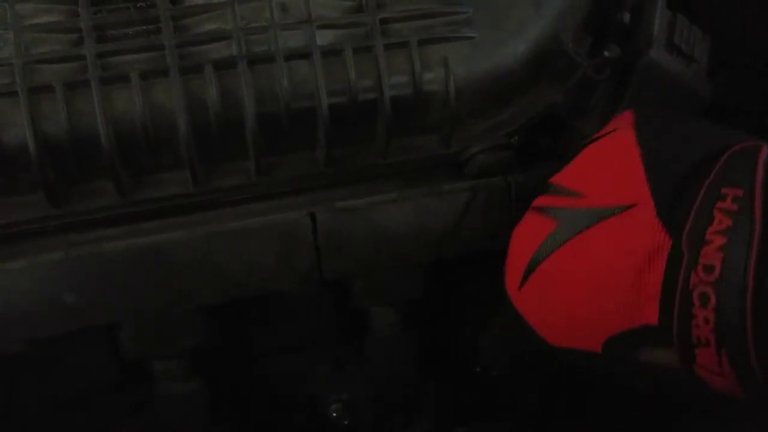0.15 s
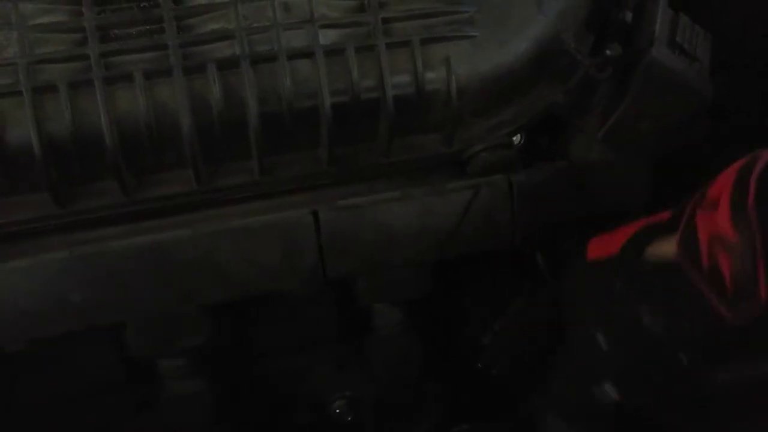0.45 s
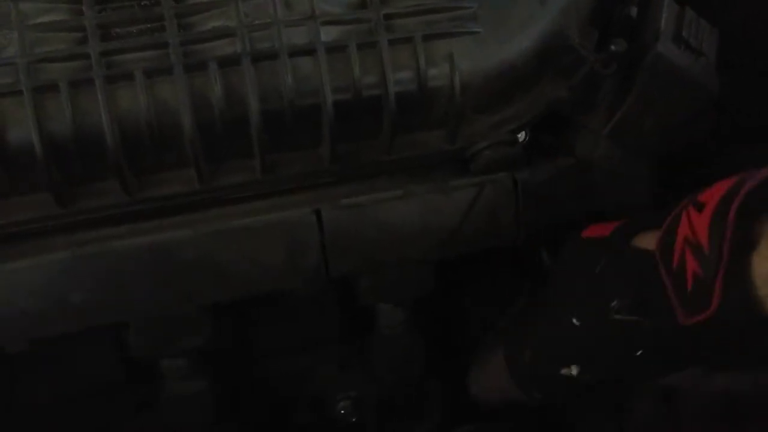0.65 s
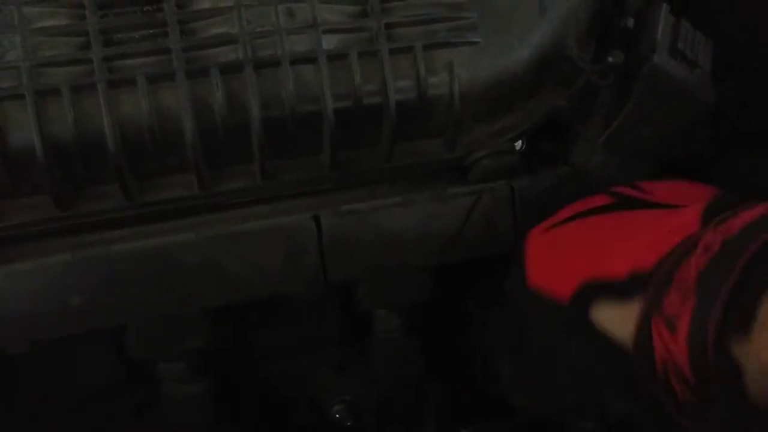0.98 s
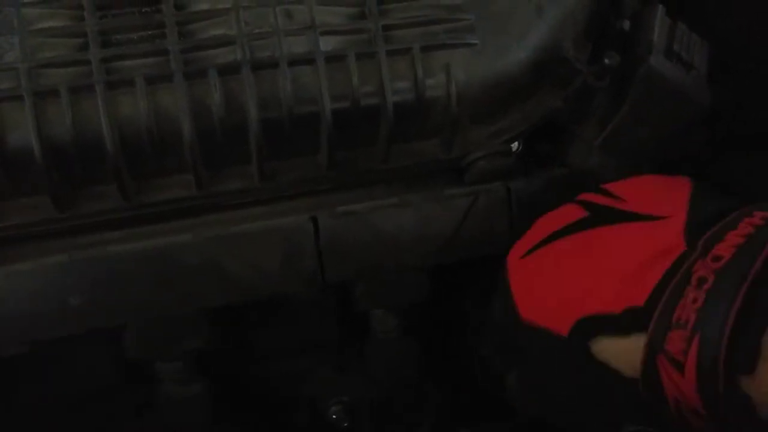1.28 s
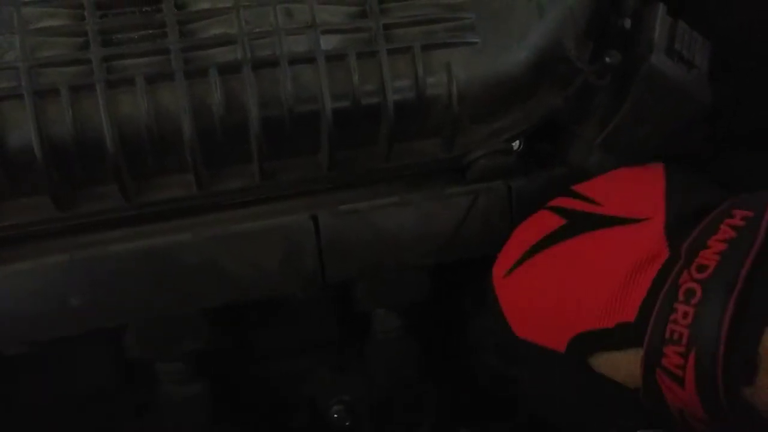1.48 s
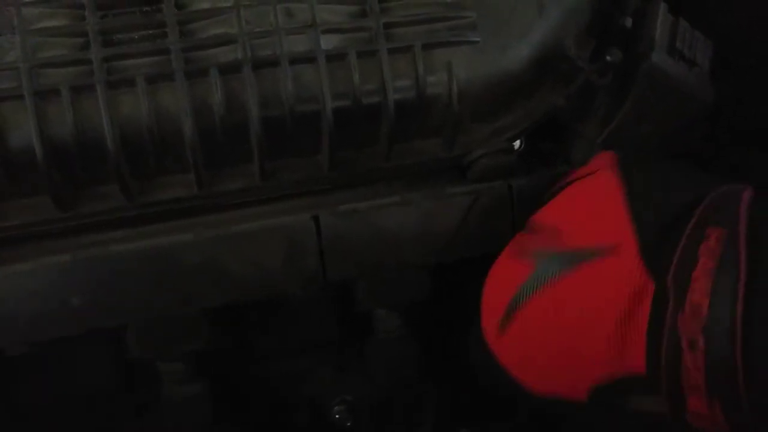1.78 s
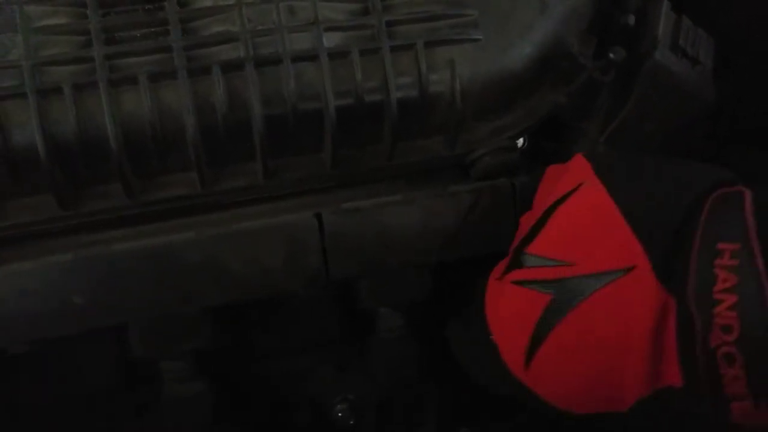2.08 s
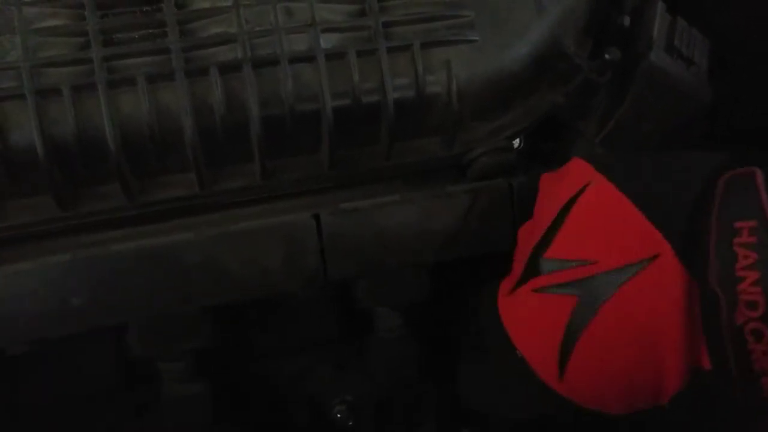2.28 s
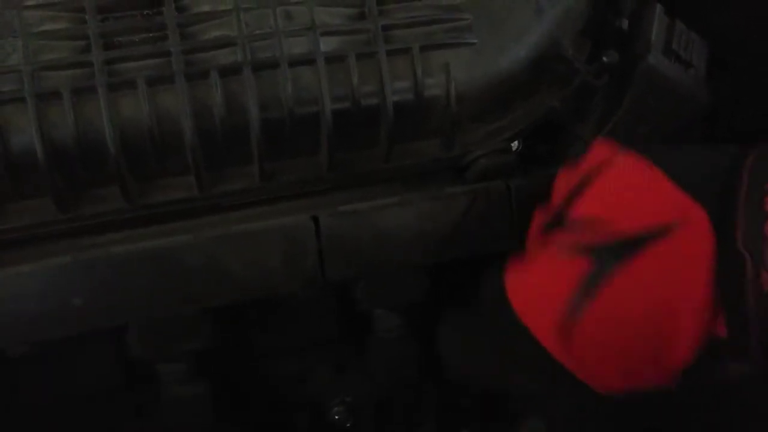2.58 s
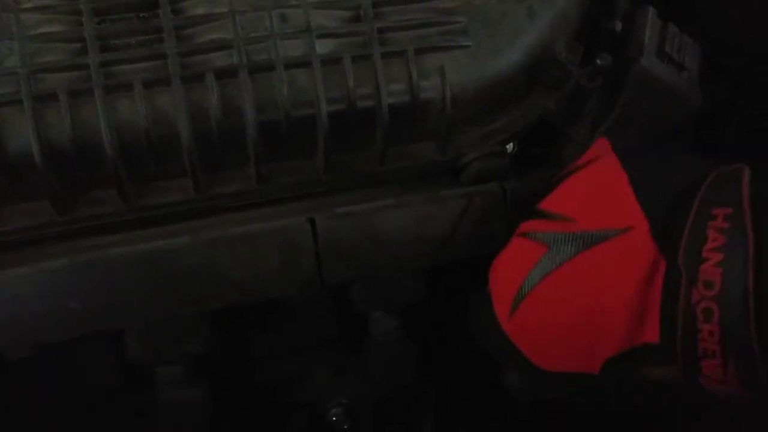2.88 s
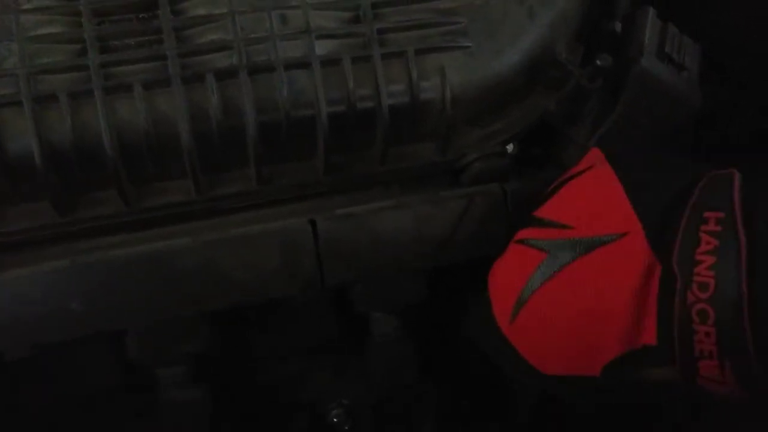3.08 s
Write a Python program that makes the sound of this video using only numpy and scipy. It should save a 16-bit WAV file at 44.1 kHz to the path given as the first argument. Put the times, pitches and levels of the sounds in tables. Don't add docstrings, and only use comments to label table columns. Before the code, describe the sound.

Plastic filler cap being twisted by a gloved hand, hollow knocks, scraping, then a loud final clatter

```python
import sys
import numpy as np
from scipy import signal
from scipy.fft import rfft, irfft, next_fast_len
from scipy.io import wavfile
from scipy.ndimage import uniform_filter1d, minimum_filter1d, map_coordinates

SR = 44100
rng = np.random.default_rng(int(sys.argv[2]) if len(sys.argv) > 2 else 0)


def file_out(sig):
    cols = np.atleast_2d(sig).T
    lim = np.clip(cols, -1, 1)
    pcm = np.round(lim * 32767).astype(np.int16)
    wavfile.write(sys.argv[1], SR, pcm)


def linear_from_db(decibels):
    return 10 ** (np.asarray(decibels, float) / 20)


N = 143325

# (frequency [Hz], width [Hz], level [dB])
NECK = [(423, 66, -9), (594.5, 53, -2), (751.6, 40.6, -4), (918, 54, -8), (1020, 70, 0), (1185, 50.4, -2.5),
        (1342.4, 83, 1.5), (1550, 81, -4), (1750, 60, -12.5), (2025, 82, -11), (2122, 59, -9.5),
        (2644, 110, -8), (3400, 150, -12), (4660, 330, -21)]
# (frequency [Hz], width [Hz], level [dB])
CAP = [(361, 40, 0), (495, 45, -0.5), (748, 65, -2), (883, 58, -5), (1133, 40, -8.5), (1526, 80, -16),
       (1944, 37, -10.5), (2530, 71, -15), (3170, 90, -9), (3940, 160, -17.5)]
# (frequency [Hz], width [Hz], level [dB])
SHELL = [(431, 20.7, -2), (856, 75, -1.5), (974, 24, -1), (1560, 33, -1), (1750, 38, -4), (2200, 59, -13),
         (2314, 14, -18), (2540, 34, -6), (2820, 78, -7.5), (3300, 88, -16), (3910, 29, -15),
         (4360, 120, -23), (4660, 170, -14.5), (5120, 25, -27)]


def unit(x):
    return x / np.sqrt(np.mean(x ** 2) + 1e-20)


def along(points, hz):
    f, v = np.transpose(points)
    return np.interp(np.log(hz + 1), np.log(f + 1), v)


def wobble(rate):
    return map_coordinates(rng.standard_normal(N // 50), [np.arange(N) * rate / SR])


def filtered(x, response):
    m = next_fast_len(x.shape[-1] + 8192)
    spectrum = rfft(x, m) * response(np.fft.rfftfreq(m, 1 / SR))
    return irfft(spectrum, m)[..., :x.shape[-1]]


def causal(gain):
    def response(hz):
        cepstrum = irfft(np.log(gain(hz) + 1e-6))
        half = len(cepstrum) // 2
        cepstrum[1:half] *= 2
        cepstrum[half + 1:] = 0
        return np.exp(rfft(cepstrum))
    return response


def tinted(x, points):
    return filtered(x, causal(lambda hz: linear_from_db(along(points, hz))))


def body(modes):
    def response(f):
        total = 0
        for k, (hz, width, db) in enumerate(modes):
            damping = 1j * f * width
            total = total + (-1) ** k * linear_from_db(db) * damping / (hz * hz - f * f + damping)
        return total
    return response


def grains(rate, spread_db):
    u = rng.random((3, N))
    size = linear_from_db(-spread_db * np.log(np.maximum(u[2], 0.04)))
    return unit((u[0] < rate / SR) * np.sign(u[1] - 0.5) * size)


def add(out, s, x):
    part = out[round(s * SR):][:len(x)]
    part += x[:len(part)]


def knocks(events, gain_db, modes, snap_db=14):
    favour_oct, rise_s = 0.87, 0.0011
    echo_s, echo_db = 0.0065, -11
    out, t = np.zeros(N), np.arange(SR // 8) / SR
    rise = 1 - np.exp(-(t / rise_s) ** 2)
    hz, width, db = np.transpose(modes)[:, :, None]
    for event in events:
        s, peak_db, pitch_hz = event[:3]
        linger_hz = event[-1]
        r = rng.standard_normal((3, len(modes), 1))
        octaves = np.log2(hz / pitch_hz)
        level = db + 1.5 * r[0] - 6 * (octaves / favour_oct) ** 2 / (1 + octaves ** 2)
        level = level + 8 * np.exp(-(np.log(hz / linger_hz) / 0.045) ** 2)
        swing = np.sin(2 * np.pi * hz * (1 + 0.006 * r[1]) * t + 0.3 * r[2])
        ring = (linear_from_db(level) * np.exp(-np.pi * width * t) * swing).sum(0)
        snap = linear_from_db(snap_db) * np.exp(-np.pi * 400 * t) * np.sin(2 * np.pi * pitch_hz * t)
        hit = rise * (ring + snap)
        gain = linear_from_db(peak_db + gain_db) / np.abs(hit).max()
        add(out, s, gain * hit)
        add(out, s + echo_s, gain * linear_from_db(echo_db) * rise * snap)
    return out


def still_air():
    # (frequency [Hz], level [dB])
    air_colour = [(30, -40), (110, -10), (200, 1), (400, -0.5), (1200, -7.5), (3000, -14), (6000, -20),
                  (16000, -18)]
    air = filtered(rng.standard_normal(N), lambda hz: linear_from_db(along(air_colour, hz)))
    return linear_from_db(-62.5 + 0.09 * wobble(5.8)) * unit(air)


def strokes(column):
    # (middle [s], length [s], glove level [dB], thread level [dB])
    hand = [(0.338, 0.18, -71.5, -70), (0.56, 0.09, -70.5, -71.5), (0.723, 0.014, -66.5, -84),
            (0.916, 0.26, -68, -60), (0.961, 0.064, -61, -48.5), (1.043, 0.048, -80, -59.5),
            (1.3, 0.056, -78, -63), (1.464, 0.15, -68.5, -67), (1.567, 0.071, -68.5, -85),
            (1.712, 0.12, -65.5, -74), (1.801, 0.088, -73, -61), (1.937, .12, -60.5, -79),
            (2.05, 0.14, -66, -64), (2.139, 0.12, -62.5, -57.5), (2.255, 0.072, -67, -55.5),
            (2.354, 0.13, -65.5, -60.5), (2.501, 0.13, -64, -55.5), (2.653, 0.1, -60, -46.5),
            (2.73, 0.14, -59.5, -56), (2.82, 0.025, -54.5, -67), (2.9, 0.076, -69, -81),
            (2.985, 0.13, -60, -85)]
    t, power = np.arange(N) / SR, np.zeros(N)
    for row in hand:
        power += linear_from_db(2 * row[column]) * np.exp(-(3 * (t - row[0]) / row[1]) ** 2)
    return np.sqrt(power)


def glove():
    # (frequency [Hz], level [dB])
    cloth = [(400, -28), (1500, -1), (4500, 0.5), (7000, -3), (16000, -10.5)]
    fibres = grains(rate=7300, spread_db=0.5) + 0.47 * rng.standard_normal(N)
    return strokes(column=2) * linear_from_db(4 + 1.2 * wobble(30)) * unit(tinted(fibres, cloth))


def thread():
    slips = grains(rate=370, spread_db=6.5) + 0.52 * rng.standard_normal(N)
    return strokes(column=3) * linear_from_db(1.9 * wobble(35)) * unit(filtered(slips, body(NECK)))


def neck_knocks():
    # (time [s], peak level [dB], contact pitch [Hz], lingering mode [Hz])
    hits = [(0.285, -32.5, 1080, 1020), (0.31, -41.5, 980, 740), (0.403, -26.5, 1150, 750),
            (0.5405, -27.5, 926, 584), (0.778, -32.5, 600, 578), (0.957, -39, 1310, 750),
            (0.9705, -25, 1000, 1020), (0.9755, -28, 925, 750), (0.979, -37, 1120, 590),
            (0.9825, -33.5, 820, 583), (1.025, -43.5, 1400, 590), (2.3335, -16, 1380, 1315),
            (2.336, -20, 1360, 745), (2.4645, -16.5, 1440, 1317), (2.4685, -14, 1203, 1170),
            (2.47, -27, 587, 594), (2.524, -35, 1090, 1190), (2.528, -36, 670, 750), (2.538, -36, 810, 750),
            (2.615, -26.5, 710, 750), (2.626, -29.5, 960, 1020), (2.673, -21.5, 1020, 1020),
            (2.68, -19, 1190, 1190)]
    return knocks(hits, -3.5, NECK)


def bay(x):
    # (frequency [Hz], t60 [s])
    decay = [(200, 0.8), (1000, 0.32), (4000, 0.4), (12000, 0.26)]
    out, step = np.zeros(N), SR // 4
    for start in range(0, N, step):
        hz, t, z = signal.stft(rng.standard_normal(SR // 2), SR, nperseg=256)
        fade = linear_from_db(-60 * t / along(decay, hz)[:, None])
        tail = signal.istft(z * fade, SR, nperseg=256)[1]
        answer = signal.fftconvolve(x[start:start + step], tail / np.linalg.norm(tail))
        add(out, start / SR + 0.0025, answer)
    return linear_from_db(-17.5) * out


def thuds():
    # (time [s], level [dB])
    pushes = [(0.361, -59), (2.186, -57), (2.25, -58), (2.503, -48), (2.614, -51)]
    centre_hz, width_hz = 236, 210
    out, t = np.zeros(N), np.arange(SR // 10) / SR
    for s, db in pushes:
        noise = rng.standard_normal(len(t))
        puff = unit(filtered(noise, lambda f: np.exp(-((f - centre_hz) / width_hz) ** 2)))
        add(out, s, linear_from_db(db) * puff * (t / 0.0076) * np.exp(1 - t / 0.0075))
    return out


def ticks():
    # (time [s], peak level [dB], t60 [s])
    edge_ticks = [(0.3974, -36, .006), (0.548, -42.5, 0.0068), (0.9702, -44, .01), (2.3339, -39.5, 0.014),
                  (2.4644, -38, 0.024), (2.666, -42, 0.017), (2.676, -33, 0.028), (2.7028, -46, 0.014),
                  (2.7166, -47, 0.013), (2.757, -34, 0.01), (2.811, -45.5, 0.021), (2.822, -44, 0.02),
                  (3.0755, -30, 0.016), (1.877, -72, .018), (2.187, -62, .018)]
    # (frequency [Hz], level [dB])
    edge = [(800, -25), (1800, 0), (3200, 4), (5000, 0), (5700, -16), (16000, -21)]
    out, t = np.zeros(N), np.arange(SR // 25) / SR
    for s, db, t60 in edge_ticks:
        add(out, s, linear_from_db(db + 7 - 60 * t / t60) * rng.standard_normal(len(t)))
    return tinted(out, edge)


def ratchet():
    # (time [s], peak level [dB], contact pitch [Hz])
    teeth = [(2.667, -7.5, 1240), (2.687, -12.5, 1140), (2.7025, -13, 1174), (2.7173, -17, 1150),
             (2.7567, -8.5, 1290), (0.5491, -14.5, 1480)]
    return knocks(teeth, -3.5, NECK, snap_db=21)


def creaks():
    # (time [s], peak level [dB], strongest pitch [Hz])
    slips = [(0.919, -39.5, 1350), (1.269, -54, 1400), (1.558, -47, 570), (1.764, -47.5, 974),
             (1.789, -41.5, 970), (1.953, -41, 820), (2.006, -45, 780), (2.032, -43.5, 1360),
             (2.068, -41.5, 1100), (2.103, -42.5, 1380), (2.128, -46.5, 990), (2.182, -40, 310)]
    return knocks(slips, -3.5, NECK)


def seal():
    # (start [s], length [s], level [dB], pitch [Hz], octave level [dB])
    squeaks = [(2.86, 0.053, -75, 5590, 11), (2.935, 0.018, -63, 5690, -22), (2.955, 0.087, -45, 5690, -24),
               (3.025, 0.026, -54, 5690, -20), (3.05, 0.025, -48, 5690, -16)]
    # (start [s], length [s], level [dB], centre [Hz], width [Hz])
    whiff = (2.997, .066, -58, 7550, 750)
    out = np.zeros(N)
    phase = 2 * np.pi * np.cumsum(1 + 0.002 * wobble(43)) / SR
    for s, length, db, hz, octave_db in squeaks:
        octave = linear_from_db(octave_db) * np.sin(2 * hz * phase + 1.5 * wobble(150))
        tone = (np.sin(hz * phase) + octave) * linear_from_db(1.6 * wobble(80))
        swell = np.sqrt(np.hanning(round(length * SR)))
        add(out, s, linear_from_db(db) * swell * tone[round(s * SR):][:len(swell)])
    s, length, db, hz, width = whiff
    air = unit(filtered(rng.standard_normal(SR // 4), lambda f: np.exp(-((f - hz) / width) ** 2)))
    swell = np.hanning(round(length * SR)) ** 0.19
    add(out, s, linear_from_db(db) * swell * air[:len(swell)])
    return out


def blows():
    # (time [s], level [dB], hold [s], t60 [s], bright crack level [dB])
    heavy = [
        (2.9135, -20.5, 0.013, 0.078, -44),
        (3.078, -24.5, 0.0086, 0.15, -17),
        (3.1805, -12, 0.032, 0.22, -21),
        (3.240, -17, .012, .1, -16),
    ]
    crack_holds = [0.015, 0.0074, 0.0033, .012]
    crack_t60s = [.015, 0.034, 0.027, .03]
    # (frequency [Hz], level [dB])
    cover = [(60, -37), (250, -7), (800, 3), (1800, -7.5), (2900, -9), (5000, -16.5), (7000, -23.5),
             (16000, -44)]
    # (frequency [Hz], level [dB])
    crack_colour = [(1000, -28.5), (3200, 7), (5000, -1), (8000, -8), (16000, -6.5)]
    settle_db, settle_t60, sizzle_db, sizzle_t60 = -17.5, 0.42, -18, 0.48
    out, t = np.zeros(N), np.arange(SR // 4) / SR

    def fall(hold, t60):
        return linear_from_db(-60 * np.maximum(t - hold, 0) / t60) * (1 - np.exp(-t / 0.0005))

    bodies = [CAP, SHELL, SHELL, SHELL]
    for blow, crack_hold, crack_t60, struck in zip(heavy, crack_holds, crack_t60s, bodies):
        s, db, hold, t60, crack_db = blow
        rattle = grains(rate=2200, spread_db=4)[:len(t)] + 0.84 * rng.standard_normal(len(t))
        burst = (fall(hold, t60) + linear_from_db(settle_db) * fall(hold, settle_t60)) * rattle
        broad = tinted(burst, cover)
        modes = filtered(burst, body(struck))
        head = round((hold + 0.019) * SR)
        add(out, s, linear_from_db(db) * (broad / broad[:head].std() + linear_from_db(-5) * modes / modes[:head].std()))
        shape = fall(crack_hold, crack_t60) + linear_from_db(sizzle_db) * fall(crack_hold, sizzle_t60)
        add(out, s, linear_from_db(crack_db) * shape * unit(tinted(rng.standard_normal(len(t)), crack_colour)))
    return out


def cracking():
    # (time [s], peak level [dB], contact pitch [Hz], lingering mode [Hz])
    impacts = [(2.9155, -18, 3150, 3170), (2.9178, -15, 1210, 1140), (2.923, -13.5, 734, 748),
               (2.927, -13, 695, 361), (2.935, -21, 500, 361)]
    return knocks(impacts, -3.5, CAP)


def metal():
    # (frequency [Hz], level [dB], t60 [s])
    metal_modes = [(511, -9, 1.2), (928, -2.5, 0.24), (1049.5, -6.5, 0.23), (1200, -10, 0.28),
                   (1995, -13.5, 0.14), (2695, -8.5, 0.072), (3596, -10, 0.11), (4646, 1, .028),
                   (4565, -9, .24), (3150, 5, 0.016), (5850, -31, .14), (8550, -33, 0.18),
                   (9440, -22.5, 0.3), (9820, -18.5, 0.11)]
    out, t = np.zeros(N), np.arange(SR // 4) / SR
    for hz, db, t60 in metal_modes:
        loose = hz / (hz + 1500)
        beat = linear_from_db(loose * 6 * np.minimum(t / 0.012, 1) * wobble(150)[:len(t)])
        slip = loose * 1.83 * wobble(148.7)[:len(t)]
        rise = 1 - np.exp(-(t * hz / 2.9) ** 2)
        tone = np.sin(2 * np.pi * hz * t + slip)
        add(out, 3.0782, linear_from_db(-12.5 + db - 60 * t / t60) * beat * tone * rise)
    return out


def clatter():
    # (time [s], peak level [dB], contact pitch [Hz], lingering mode [Hz])
    impacts = [(3.1812, -3, 2130, 2200), (3.184, -4, 990, 974), (3.1893, -10.5, 900, 974),
               (3.195, -5.5, 1550, 1560), (3.197, -6.5, 2800, 2820), (3.1985, -8, 736, 856),
               (3.2045, -7, 525, 431), (3.211, -8, 1000, 974), (3.215, -10.5, 1310, 1750),
               (3.22, -4.5, 1900, 2540), (3.2255, -13, 950, 974), (3.241, -7.5, 2630, 2540),
               (3.246, -6, 610, 431)]
    return knocks(impacts, -3, SHELL)


def scene():
    near = neck_knocks() + thuds() + ticks() + ratchet() + creaks()
    near = near + seal() + blows() + cracking() + metal() + clatter()
    mid = still_air() + glove() + thread() + near + bay(near)
    return np.array([mid, mid])


def band_limit(x):
    return signal.sosfilt(signal.butter(12, 16300, fs=SR, output="sos"), x)


def record(dry):
    # (frequency [Hz], level [dB])
    mic = [(4900, 0), (5700, -3.5), (8000, -6.5), (10000, -2), (15500, -5.5)]
    # (start [s], end [s])
    apart = [(.34, .36), (.66, .68), (1.59, 1.61), (2.46, 2.51), (2.79, 2.82), (2.91, 2.98), (3.074, 3.086)]
    low_cut_hz, top_hz, ceiling = 194, 16150, 0.69

    def band(f):
        return (1j * f / (low_cut_hz + 1j * f)) ** 2 * np.clip((top_hz - f) / 500, 0, 1)

    def scatter(f):
        phase = np.exp(3j * np.sin(f / 70) + 3j * np.sin(f / 190))
        return linear_from_db(-8) * phase / (1 + (6200 / (f + 1)) ** 8)

    x = filtered(tinted(dry, mic), band)
    need = minimum_filter1d(np.minimum(1, ceiling / (np.abs(x[0]) + 1e-9)), size=33)
    x = x * uniform_filter1d(need, size=17)
    x = filtered(x, lambda f: 1j * f / (50 + 1j * f))
    t = np.arange(N) / SR
    parted = sum(((t > a) & (t < b)) * 1.0 for a, b in apart)
    side = uniform_filter1d(parted, size=200) * filtered(x[0], scatter)
    return band_limit(x + [side, -side])


dry = scene()
out = record(dry)
file_out(out)
```